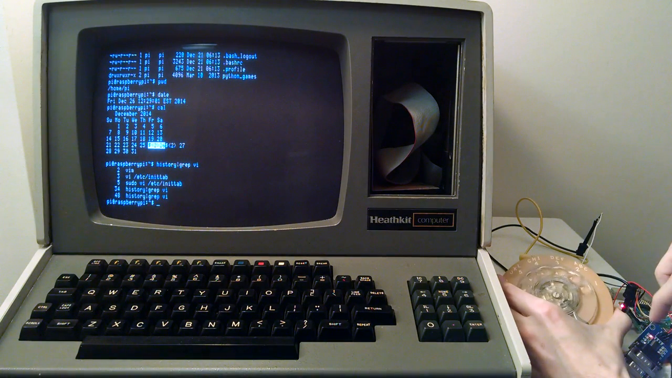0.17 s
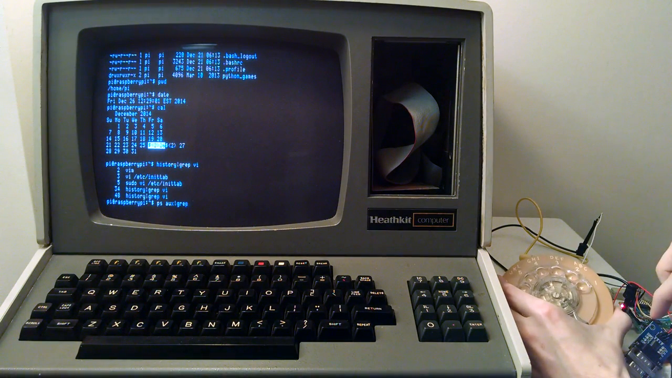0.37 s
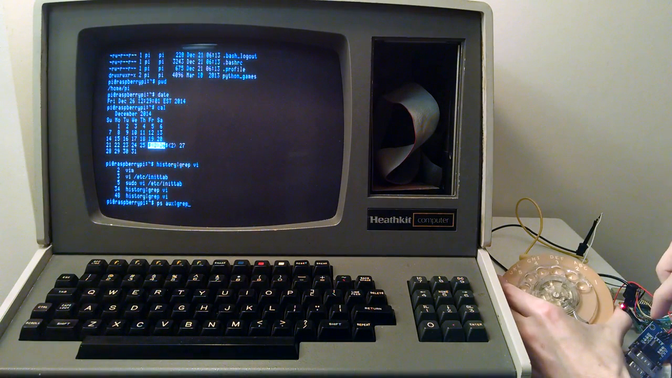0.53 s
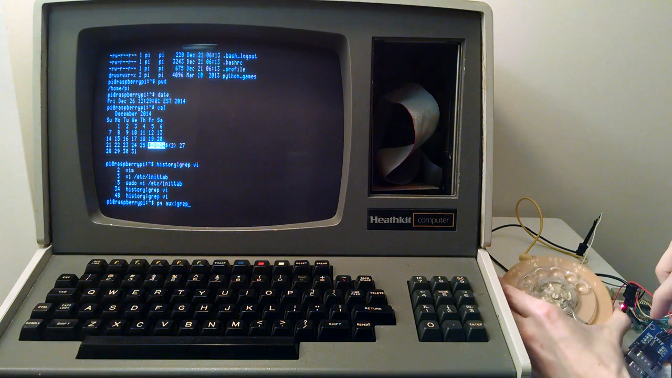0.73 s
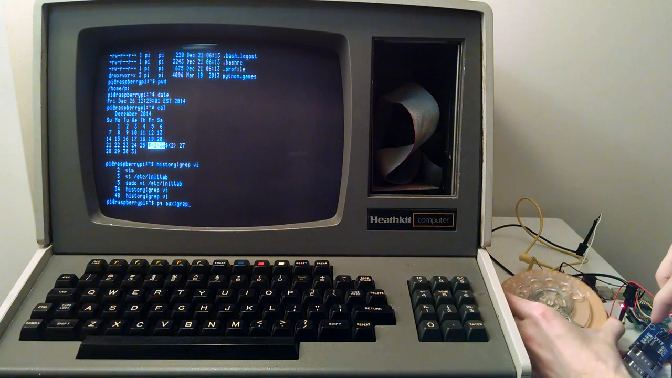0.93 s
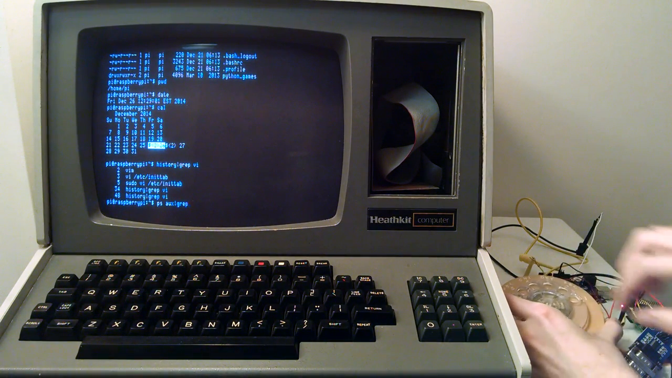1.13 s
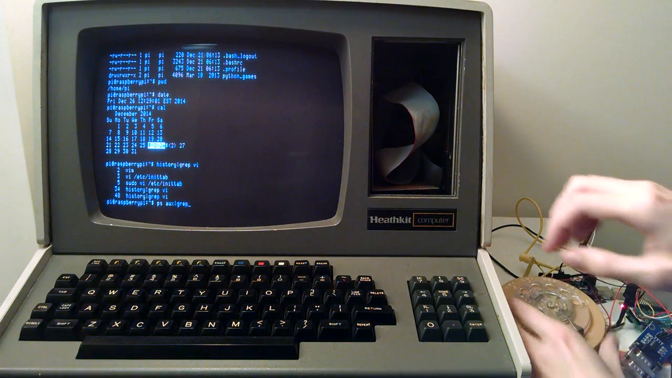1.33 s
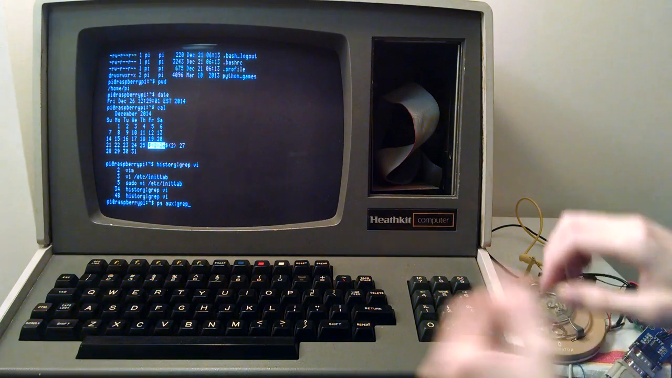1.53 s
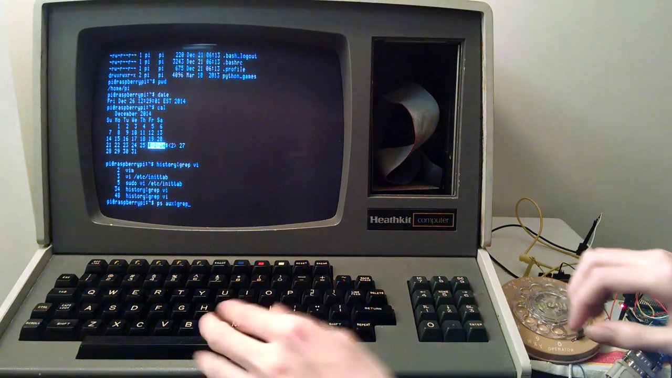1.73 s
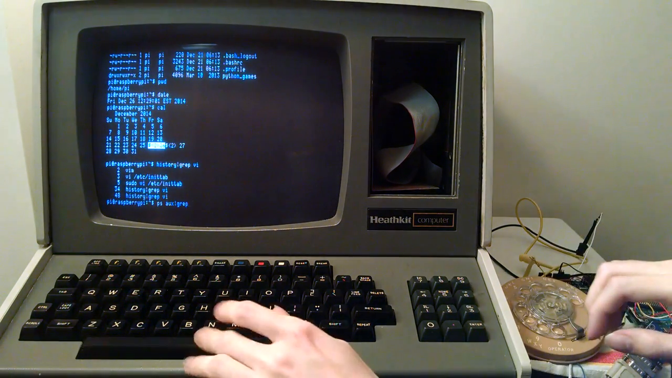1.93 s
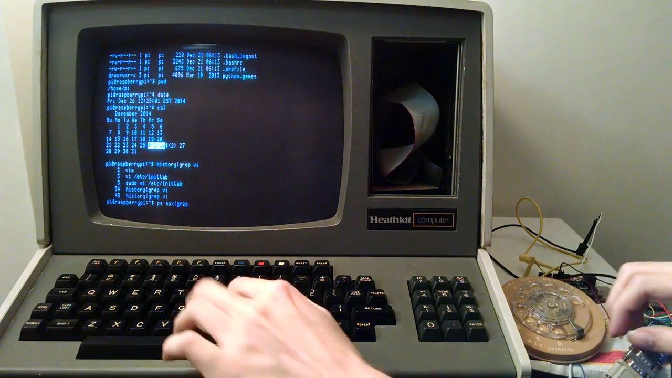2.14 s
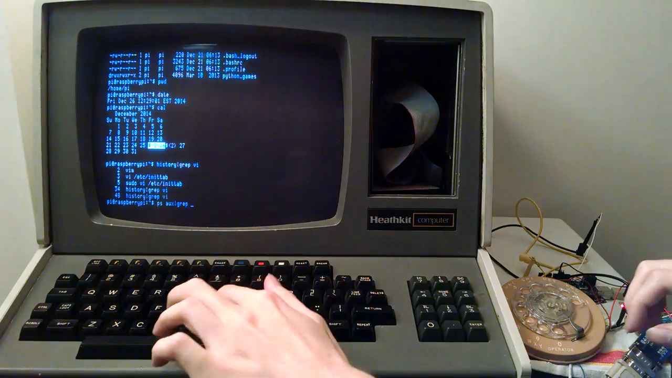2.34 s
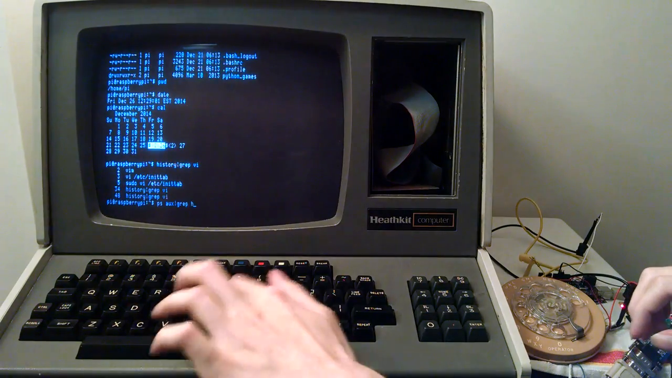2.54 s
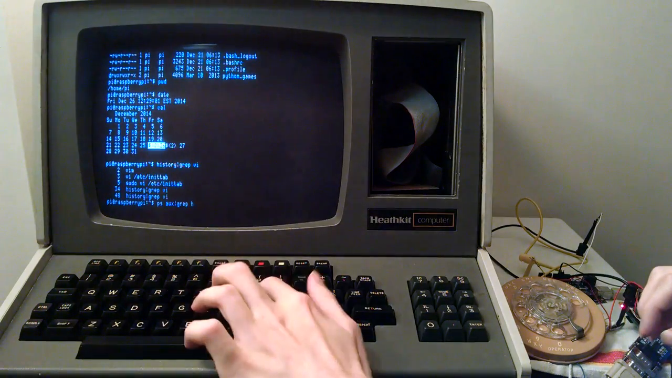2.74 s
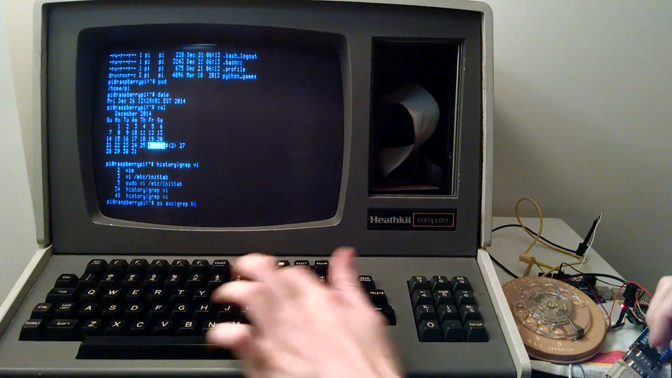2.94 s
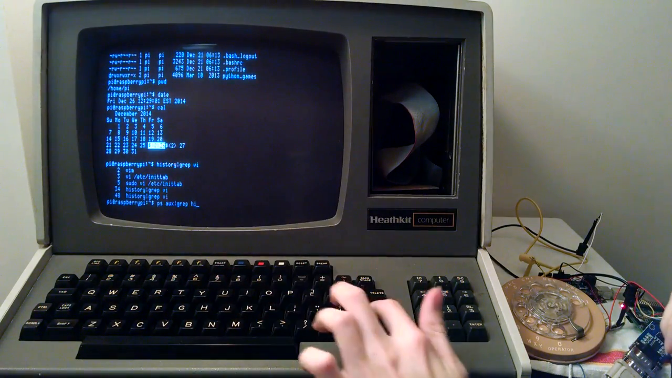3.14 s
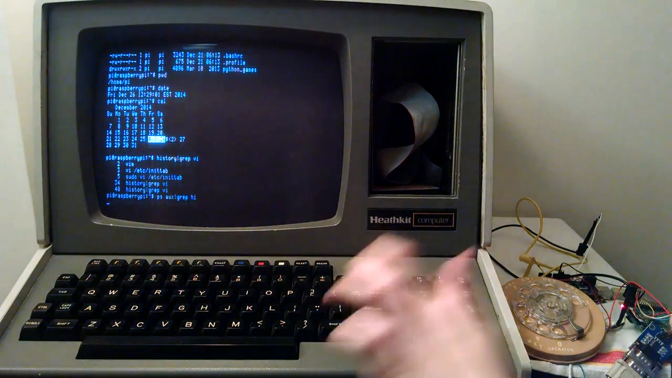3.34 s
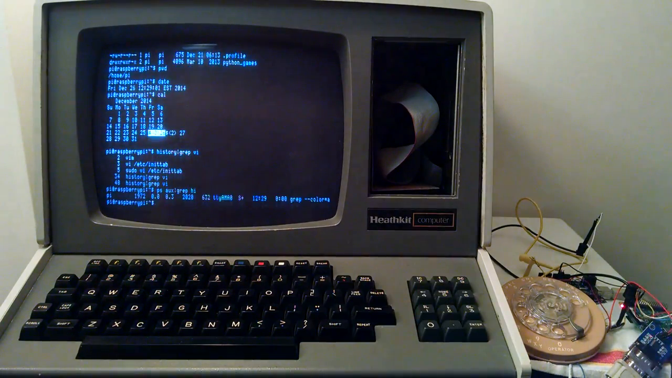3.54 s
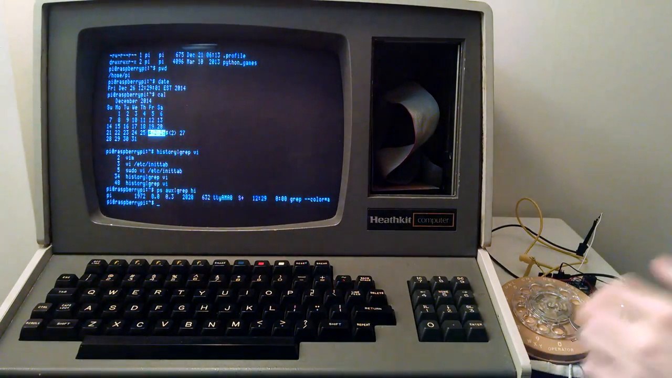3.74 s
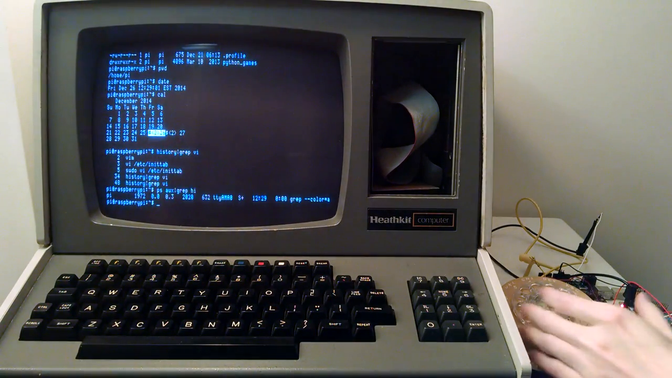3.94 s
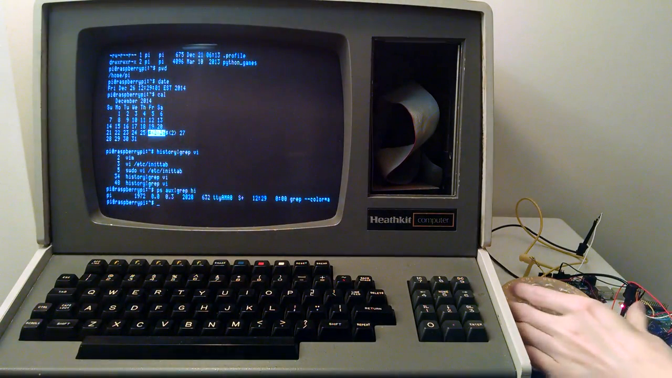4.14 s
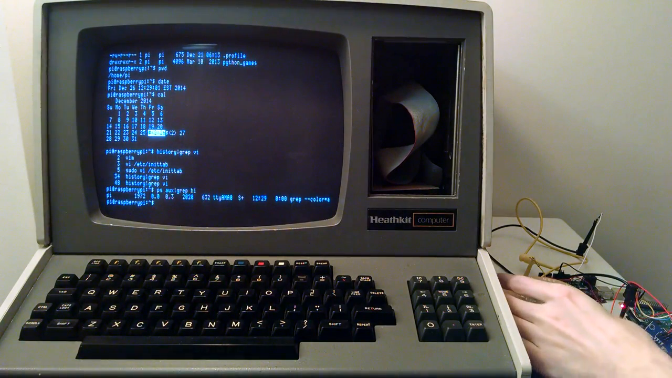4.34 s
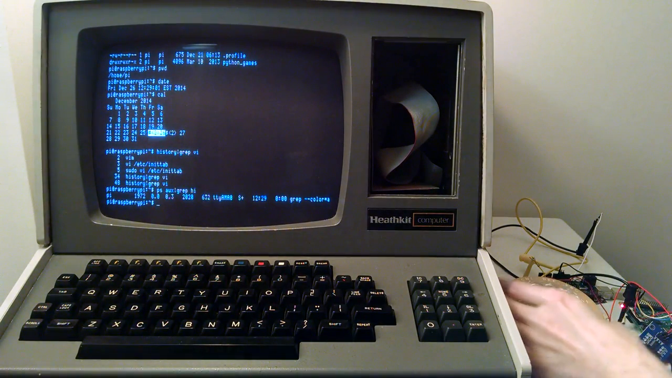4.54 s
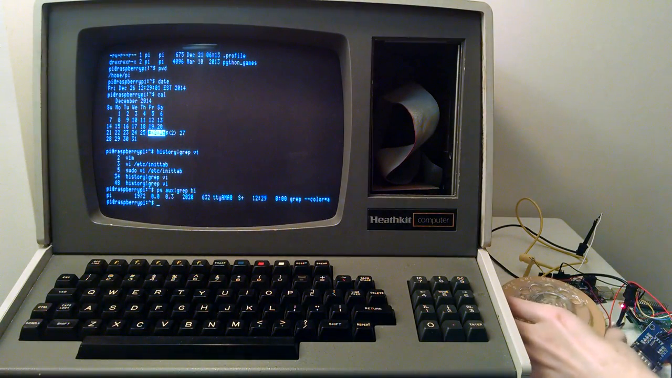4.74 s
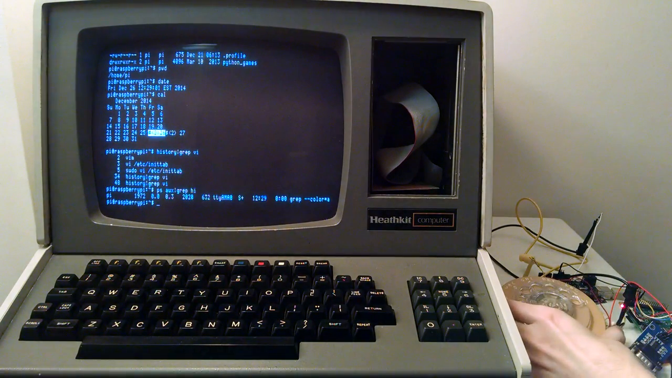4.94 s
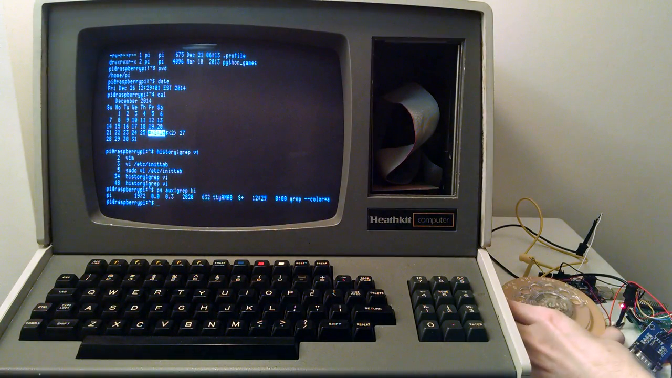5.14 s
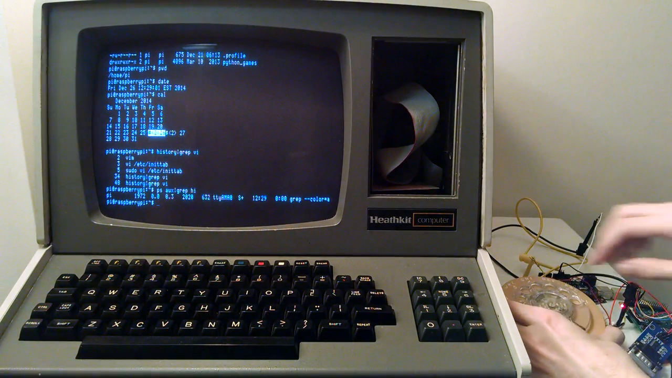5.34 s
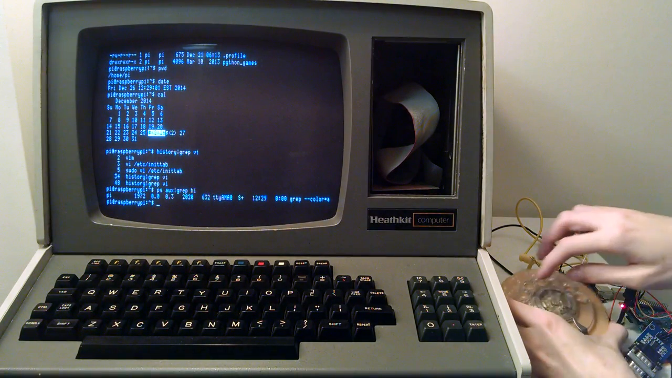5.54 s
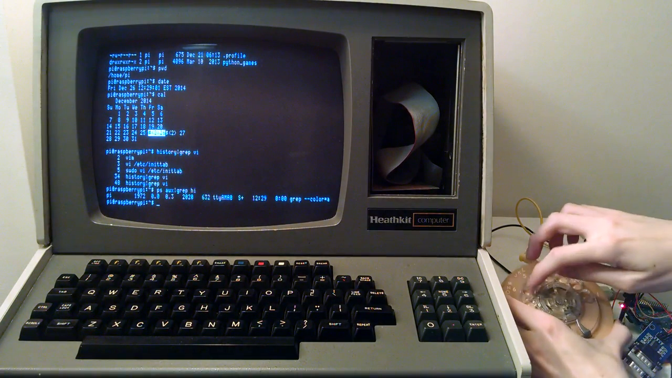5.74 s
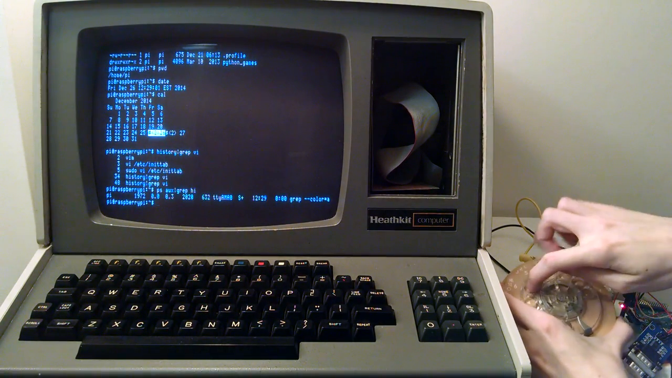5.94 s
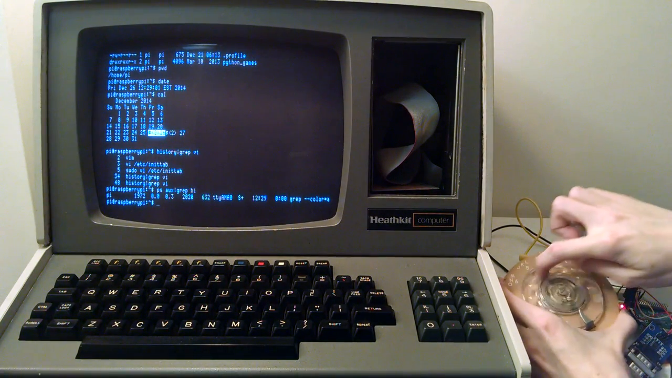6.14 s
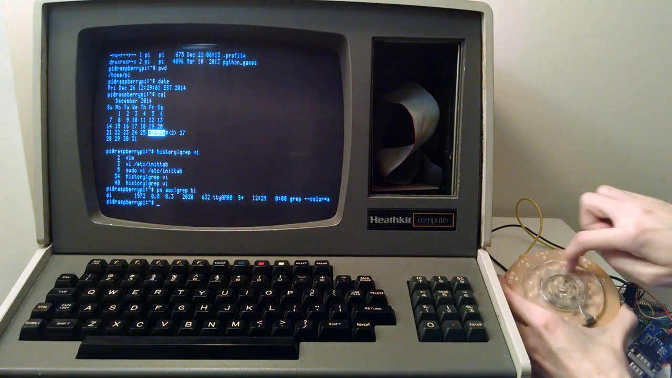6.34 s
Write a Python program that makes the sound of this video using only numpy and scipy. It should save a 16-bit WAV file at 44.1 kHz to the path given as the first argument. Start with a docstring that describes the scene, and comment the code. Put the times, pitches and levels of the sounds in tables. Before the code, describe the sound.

A steady fan rushes through a resonant case for about six seconds, with faint wavering tones, a low hum and a very high, thin screen whine. Soft dull pulses come about twice a second, alternately a hum puff and a bump. From 0 to 0.33 s a rotary dial runs home with a bright, gritty, ratcheting whirr and small contact clicks, ending in a sharp stop click. Near 1.5 to 1.6 s fingers softly bump its base. Keys then strike in uneven pairs at 2.09 and 2.20, 2.56 and 2.66, 2.94 and 3.04, 3.40 and 3.46 s: crisp plastic snaps, ringing metal, hollow thuds, quick rebounds and springy rattles, the first ones loudest. Around 2.7 s the low hum swells and beats slowly. After 3.6 s only hum, fan, whine and pulses continue. Small room, close wide stereo; background dips slightly after loud keys.

```python
"""A terminal's fan hums and its picture tube whines throughout; a clock-like pulse comes about twice a second.
First a rotary dial whirs home on its governor and gear noise, clicks at its stop and rings out.
Fingers then leave its base, and eight key strokes follow: contact noise over ringing metal and hollow case.
Between them a low beating hum swells. All but the tube whine and the whirr's low ringing tone is widened by
two close microphone ports; a gain control ducks after loud keys, holds and recovers."""
import sys
import numpy as np
from scipy import signal
from scipy.fft import rfft, irfft, next_fast_len
from scipy.io import wavfile
from scipy.ndimage import uniform_filter1d, minimum_filter1d, map_coordinates

SR = 44100
rng = np.random.default_rng(int(sys.argv[2]) if len(sys.argv) > 2 else 0)


def master(y):
    """Save y as 16-bit WAV."""
    cut = np.clip(np.atleast_2d(y).T, -1, 1)
    pcm = np.round(cut * 32767)  # scale
    wavfile.write(sys.argv[1], SR, pcm.astype(np.int16))


N = 285768
TIME = np.arange(N) / SR  # s, the whole scene
AGE = np.arange(SR // 4) / SR  # s since a short sound began

# Spectra give relative colour only: the noise they shape is then set to rms 1.
# fan air and hiss: pitch_hz, density_db
AIR_SPECTRUM = [(20, -32), (32, -1.5), (52, 0.5), (96, -8.5), (204, -7), (300, -7.5), (420, -7),
                (650, -5.5), (930, -12.5), (1350, -17.5), (2100, -16.5), (2800, -19), (3800, -22),
                (5500, -24.5), (7000, -24.5), (9000, -30), (12000, -26), (14500, -24.5), (15400, -29),
                (15700, -42)]
# resonances of the fan's air path: pitch_hz, width_hz, gain_db
AIR_RESONANCES = [(50, 31, 4), (165, 3.5, 3.5), (208.5, 15, 8), (366, 77, 7), (516, 5, 5.5),
                  (736, 7.2, -7.5), (780, 14, 6.5), (1128, 48, 3), (1286, 24, 3.5), (1362, 21, 6),
                  (1437, 10, 6), (3900, 340, 5.5)]
# unsteady fan tones: pitch_hz, level_db (before a common trim)
FAN_TONES = [(384, -50), (593, -47.5), (714, -51.5), (769, -51), (833, -45.5), (887, -70.5), (1152, -49.5),
             (1535, -61)]

# low hum, then its octave, each beating: level_db (after the swell), beat_period_s, crest_s, beat_depth (0-1)
DRONE_PARTIALS = [(-49.5, 0.522, 3.67, 0.38), (-47.5, 0.907, 3.71, 0.37)]
# the hum starts softer and swells: swell centre, how fast, level before
DRONE_SWELL_S, DRONE_RISE_S, DRONE_EARLY_DB = 2.7, 0.092, -6

# tube's line whine, then its lower sidebands: mid_db (in phase), side_db (in opposite phase)
WHINE_PARTIALS = [(-49.5, -44), (-57.5, -37), (-55.5, -51), (-62, -68)]
LINE_HZ, SIDEBAND_HZ = 15448, 384

PULSE_TIMES_S = .293 + np.arange(7)

# colour of the dial's whirr: pitch_hz, density_db
WHIRR_SPECTRUM = [(1300, -12), (2300, 0), (3300, -3.5), (4700, -9.5), (7500, -2), (9100, -5), (10300, 1.5),
                  (12500, 0), (14500, -2), (15400, -2), (16000, -25)]
# tone colour of the whirr, bands raised or lowered: pitch_hz, width_hz, gain_db
WHIRR_BANDS = [(2500, 250, -29), (4300, 100, 12), (4720, 43, 15), (5660, 52, 13), (6200, 64, 9),
               (6700, 100, -2), (8850, 90, 12.5), (9400, 100, 9), (10080, 80, -5), (12300, 110, 3),
               (12880, 220, 8.5), (13900, 60, 4)]
# bands of the whirr's low ringing tone, heard only in the side: pitch_hz, width_hz, gain_db
SIDE_TONE_BANDS = [(2430, 55, 21), (2650, 80, 20)]
# dial contacts, then the end stop: start_s, level_db
DIAL_CLICKS = [(.049, -37), (.111, -32), (.132, -34), (.159, -35), (.18, -32), (.19, -32), (0.3274, -19.5),
               (.3288, -18), (.3305, -22)]
# colour of those clicks: pitch_hz, density_db
CLICK_SPECTRUM = [(3000, -24), (5000, -19), (6500, -3), (9000, 3), (11500, -6), (14500, -3), (16000, -11)]
# fingers let go of the dial's wooden base: start_s, level_db
BASE_BUMPS = [(1.512, -36), (1.592, -28)]
WHIRR_DB, SPIN_UP_DB_PER_S = -35.5, 11  # whirr level at 0 s and its growth as it runs
COAST_S, COAST_DB = 0.214, -36  # after the last contact it coasts more quietly
HOME_S, RING_OUT_DB_PER_S = 0.33, 270  # at the stop the works ring out
SIDE_TONE_DB = -9  # over the whirr

# key strokes: start_s, strength_db, hardness_db, thud_db, thud_hz, clack_hz, ping_db, stem_hz, tick_db,
# contact_s, rebound_delay_s, rebound_db, rebound_thud_db.
# Later dB count from the strength, rebound_thud_db from the rebound's own; thuds get a common trim.
KEY_STROKES = [(2.088, -14.5, 3.5, -5, 397, 1270, 1.5, 2440, -7, 0.000098, .0098, -7, 14),
               (2.1965, -12.5, -16, -1, 450, 1150, -3, 2150, -4, 0.00051, .0078, -1, 3),
               (2.5594, -16.5, 3, 3.5, 670, 1110, 8.5, 2470, -1.5, 0.00024, 0.0067, -7, 5),
               (2.6576, -31, -6, -4, 500, 1250, 2.5, 2410, -5.5, 0.00046, .0043, 2, -4),
               (2.9446, -23.5, -2, -6, 700, 1450, 8.5, 2420, -6.5, 0.00046, 0.0047, -2, 2),
               (3.038, -24.5, -12, -4, 850, 1280, 0, 2510, -1.5, 0.00035, .0105, -3.5, -13),
               (3.4, -18.5, 15, -2, 600, 1500, 5, 2530, -2, 0.00015, .008, -10.5, 9),
               (3.4641, -22, 1, 6, 575, 1200, -9, 2500, 1, 0.00063, 0.0035, -2, 13.5)]
# one contact's hard impact, over in a few cycles: pitch_hz, level_db, t60_s
IMPACT_MODES = [(1535, -8, 0.017), (3370, -20, 0.0061), (5050, -11.5, 0.004), (7130, -10, 0.0068),
                (10700, -4, 0.0018), (13700, -6, 0.0027)]
# the hollow case: pitch_hz, level_db, t60_s
CASE_MODES = [(135, 2, 0.067), (244, 4.5, 0.037), (345, 1, 0.059), (438, 3.5, 0.11), (507, 8.5, 0.049),
              (583, 2, 0.076), (680, 9, 0.046), (747, 5.5, 0.041), (844, -2, 0.1)]
# the plate that holds the keys: pitch_hz, level_db, t60_s
PLATE_MODES = [(862, 0.5, 0.071), (963, -4.5, 0.11), (1129, -2.5, 0.071), (1223, 0.5, 0.053),
               (1290, -9, 0.08), (1393, -1, 0.077), (1476, -9.5, 0.046), (1670, 0, 0.051), (2080, -14, .04)]
# a key's stem: pitch_ratio (multiple of its pitch), level_db, t60_s
STEM_MODES = [(1, -1, 0.014), (.94, -10, 0.0054), (1.09, -6, 0.0094), (.995, -21, .075), (1.38, -15, .025),
              (1.46, -18, 0.059)]
# colour of the plastic snap: pitch_hz, density_db
SNAP_SPECTRUM = [(500, -15), (1400, 0.5), (2000, -8), (2500, 16), (3100, 2), (3700, 5), (4800, -5),
                 (7500, -10), (10000, -19), (16000, -26)]
# colour of ticks, rubs and puffs: pitch_hz, density_db
TICK_SPECTRUM = [(3000, -1.5), (6000, -2), (9000, -2), (11800, 3.5), (14200, 4), (15100, -8), (16000, -22)]
# key springs that rattle and ring on: start_s, pitch_hz, width_hz, level_db, t60_s
SPRING_RINGS = [(2.088, 8650, 120, -36, 0.091), (2.198, 8550, 120, -40.5, 0.1),
                (2.2, 13500, 400, -27, 0.19), (2.1985, 13500, 1000, -28, 0.038),
                (2.2045, 14000, 600, -32, 0.039), (2.218, 5670, 150, -32, 0.051),
                (2.56, 11600, 300, -25.5, 0.068), (2.5803, 12000, 300, -27, .02),
                (2.9485, 3550, 200, -28.5, 0.03), (3.039, 13200, 300, -34, .08)]
# fingers graze a cap or the dial: start_s, level_db
FINGER_TOUCHES = [(1.53, -40), (1.607, -41), (1.99, -35.5), (2.175, -38), (2.65, -38), (2.798, -34.5),
                  (3.021, -34), (3.461, -32)]
CASE_REACH_HZ, PLATE_REACH_HZ = 271, 254  # how far from its own pitch a key still drives the modes
IMPACT_DB, CLACK_DB, SNAP_DB = 2, -5, -6
SNAP_PER_HARDNESS = 0.81  # dB of plastic snap per dB of hardness
SLIDE_DB, SLIDE_S = -14, 0.0047  # the stem's rub: level over its tick, rise time
TOUCH_CLACK_DB, TOUCH_HZ = -9, 1290  # a graze's faint plate ring, over the graze
CHATTER_PER_S, CHATTER_T60_S, CHATTER_SHARE = 120, 0.0091, .75  # a loose cap taps after each blow
REBOUND_HARDNESS_DB, REBOUND_TICK_DB, REBOUND_PING_DB = 4.5, -6, -5  # added for the second contact

# the small room's decay: pitch_hz, t60_s
ROOM_DECAY = [(200, 0.54), (1200, 0.13), (4000, 0.27), (14000, 0.058)]
# the two ports: pitch_hz, side_db, share (of the side that follows the mid), phase_rad, cross_feed (share)
PORTS = [(50, -1, 0.92, 2.7, 0.0029), (134, -5, 1, 1.85, 0.013), (222, -3.5, 0.55, 2.8, 0.14),
         (415, -6.5, 0.28, 0.85, 0.0093), (870, -9.5, 1, 3.2, 0.61), (1310, -0.5, .1, 4.4, 1),
         (2420, -4.5, 0.18, 2.5, 0.87), (3550, -3, 0.45, 4.45, 0.16), (7000, 2, 0.38, 4.5, 0.34),
         (13000, -1, 0.59, 3.4, 0.83)]
TOP_HZ = 15800  # band limit


def amp(db):
    """Decibels to gain."""
    return 10 ** (np.asarray(db) / 20)


def unit(x):
    """Scale to rms 1."""
    return x / np.sqrt(np.mean(x ** 2) + 1e-20)


def along(points, hz):
    """Read (pitch_hz, value) points on a log frequency axis."""
    f, v = np.transpose(points)
    return np.interp(np.log(hz + 1), np.log(f + 1), v)


def wobble(rate):
    """A smooth random curve, rate knots a second."""
    knots = rng.standard_normal(int(N * rate / SR) + 4)
    steps = np.arange(0, len(knots) - 1, 1 / 8)
    return np.interp(TIME * rate, steps, map_coordinates(knots, [steps]))


def filtered(x, response):
    """Shape x by a response of frequency."""
    n = x.shape[-1]
    padded = next_fast_len(n + 8192)
    hz = np.fft.rfftfreq(padded, 1 / SR)
    return irfft(rfft(x, padded) * response(hz), padded)[..., :n]


def noise(spectrum, size):
    """Two unrelated coloured noises of rms 1."""
    return unit(filtered(rng.standard_normal((2, size)), lambda hz: amp(along(spectrum, hz))))


def humps(bands, hz):
    """Gain of raised or lowered bands, each a bell in dB around its centre."""
    return amp(sum(db / (1 + ((hz - centre) / width) ** 2) for centre, width, db in bands))


def fade(t60):
    """An exponential decay, 60 dB down after t60 seconds."""
    return np.exp(-np.log(1000) * AGE / max(t60, 1e-3))


def ring(modes, scatter):
    """Struck modes decay as sines, at slightly new strengths per blow; scatter (rad) spreads their phases."""
    out = 0
    for hz, db, t60 in modes:
        gain = amp(db + rng.normal(0, 0.2, (2, 1)))
        phase = scatter * rng.standard_normal((2, 1))
        out = out + gain * fade(t60) * np.sin(2 * np.pi * hz * AGE + phase)
    return out


def struck(modes, centre_hz, reach_hz):
    """The ring of these modes when a key drives mostly those near its own pitch."""
    driven = [(hz, db - 20 * np.log10(1 + ((hz - centre_hz) / reach_hz) ** 2), t60) for hz, db, t60 in modes]
    return ring(driven, scatter=.55)


def add(track, s, sound):
    """Mix a sound in at time s."""
    part = track[:, max(round(s * SR), 0):][:, :sound.shape[1]]
    part += sound[:, :part.shape[1]]


def in_room(sound, near_db, far_db):
    """A short sound with quick echoes off desk and screen, and the small room's tail, shorter where damped."""
    hz, t, z = signal.stft(rng.standard_normal((2, len(AGE))), SR, nperseg=256)
    decay = np.exp(-np.log(1000) * t / along(ROOM_DECAY, hz)[:, None])
    tail = signal.istft(z * decay, SR, nperseg=256)[1][:, :len(AGE)]
    near = rng.standard_normal((2, len(AGE))) * fade(0.085) * (AGE > .002)
    echoes = amp(near_db) * near / np.linalg.norm(near[0]) + amp(far_db) * tail / np.linalg.norm(tail[0])
    return sound + signal.fftconvolve(sound, echoes, axes=1)[:, :len(AGE)]


def fan():
    """Air rushes through the resonant case, with slightly unsteady tones on top."""
    flutter_db = .35 * wobble(5)
    rush = unit(filtered(noise(AIR_SPECTRUM, N), lambda hz: humps(AIR_RESONANCES, hz)))
    out = amp(-35.5 + flutter_db) * rush
    quadrature = np.array([[0], [np.pi / 2]])
    for hz, db in FAN_TONES:
        phase = 2 * np.pi * np.cumsum(hz + 0.812 * wobble(6)) / SR
        tone_db = db - 1.5 + 1.2 * wobble(4.014)
        out += np.sqrt(2) * amp(tone_db) * np.sin(phase + quadrature)
    return out


def drone(drone_hz=131):
    """A low hum with its octave; both beat slowly and grow louder partway through."""
    out, quadrature = np.zeros((2, N)), np.array([[0], [np.pi / 2]])
    early = (1 - np.tanh((TIME - DRONE_SWELL_S) / DRONE_RISE_S)) / 2  # 1 before the swell, 0 after
    phase = 2 * np.pi * np.cumsum(drone_hz + 0.58 * wobble(6)) / SR
    for k, (db, period, crest, depth) in enumerate(DRONE_PARTIALS):
        beat = 1 + np.clip(depth, 0, 1) * np.cos(2 * np.pi * (TIME - crest) / period)
        out += np.sqrt(2) * amp(db + DRONE_EARLY_DB * early) * beat * np.sin((k + 1) * phase + quadrature)
    return out


def tube():
    """Mid and side of the line whine; their levels drift as hands move through its standing waves."""
    out = np.zeros((2, N))
    for k, (mid_db, side_db) in enumerate(WHINE_PARTIALS):
        phase = 2 * np.pi * (LINE_HZ - k * SIDEBAND_HZ) * TIME
        mid = amp(mid_db + 0.7 * wobble(3.9)) * np.sin(phase)
        side = amp(side_db + .7 * wobble(2.95)) * np.cos(phase + .25)
        out += np.sqrt(2) * np.array([mid, side])
    return out


def clock():
    """A soft hum burst with a puff of hiss every second, and a duller bump in between."""
    out, puffs = np.zeros((2, N)), np.zeros(N)
    for s in PULSE_TIMES_S:
        t = TIME - s
        hum = np.sin(2 * np.pi * 210 * t + rng.uniform(0, 2 * np.pi, (2, 1)))
        bump = np.sin(2 * np.pi * 140 * t + rng.uniform(0, 2 * np.pi))
        out += amp(-32.0) * np.exp(-(t / 0.03) ** 2) * hum
        out += amp(-30) * np.exp(-((t - .487) / 0.0087) ** 2) * bump
        puffs += np.exp(-np.abs(t) / 0.032)
    return out + amp(-41.5) * puffs * noise(TICK_SPECTRUM, N)


def dial_effort(governor_hz=40, sway=0.091, flutter=0.079):
    """How hard the works rub: spin up, coast, ring out, pulsing at the governor's turns and third harmonic."""
    running_db = np.where(TIME < COAST_S, WHIRR_DB + SPIN_UP_DB_PER_S * TIME, COAST_DB)
    level_db = running_db - RING_OUT_DB_PER_S * np.maximum(TIME - HOME_S, 0)
    turn = 2 * np.pi * np.cumsum(governor_hz + wobble(16)) / SR
    return amp(level_db) * (1 + sway * np.sin(turn) + flutter * np.sin(3 * turn))


def patchy(x, depth_db):
    """The rubbing excites ever different resonances: a random gain over time and frequency."""
    z = signal.stft(x, nperseg=256)[2]
    field = uniform_filter1d(rng.standard_normal(z.shape[1:]), size=3, axis=0)
    field = uniform_filter1d(field, size=4, axis=1)
    return signal.istft(z * amp(depth_db * unit(field)), nperseg=256)[1][:, :N]


def whirr_side_tone():
    """Mid (silent) and side of the whirr's low ringing tone: narrow noise near 2.4 and 2.65 kHz."""
    tone = unit(filtered(rng.standard_normal(N), lambda hz: humps(SIDE_TONE_BANDS, hz) - 1))
    return np.outer([0, 1], amp(SIDE_TONE_DB) * dial_effort() * tone)


def dial(teeth_per_s=171, teeth_db=-7):
    """The governor rubs and gear teeth tick as the dial runs home; it clicks at its stop and the hand lets go."""
    tooth = np.floor(np.cumsum(teeth_per_s * (1 + 0.025 * wobble(20))) / SR)
    teeth = unit(np.diff(tooth, prepend=0) * rng.uniform(0.54, 1, N))
    # each tooth leaves a short decaying scrape
    scrapes = np.sqrt(np.abs(signal.fftconvolve(teeth ** 2, fade(0.0067) ** 2)[:N]))
    rubbing = rng.standard_normal((2, N)) * amp(.6 * wobble(299))
    ticking = unit(scrapes * rng.standard_normal((2, N)))
    works = patchy(rubbing + amp(teeth_db) * ticking, depth_db=1.5)
    whirr = unit(filtered(works, lambda hz: amp(along(WHIRR_SPECTRUM, hz)) * humps(WHIRR_BANDS, hz)))
    out = dial_effort() * whirr
    for s, db in DIAL_CLICKS:
        click = noise(CLICK_SPECTRUM, len(AGE)) * fade(0.0078)
        add(out, s, amp(db) * in_room(click, near_db=-14, far_db=-12))
    for s, db in BASE_BUMPS:
        # the base borrows the hollow case's modes, with a soft onset
        add(out, s, amp(db) * ring(CASE_MODES, scatter=1.0) * (1 - fade(0.084)))
    return out


def slides():
    """The key stem rubs in its guide just before each stroke lands, in proportion to its tick."""
    out = np.zeros(N)
    for s, db, *_, tick_db, contact_s, delay, rebound_db, rebound_thud_db in KEY_STROKES:
        out += amp(db + tick_db + SLIDE_DB) * np.exp(-np.abs(TIME - s) / SLIDE_S) * (TIME < s)
    return out * noise(TICK_SPECTRUM, N)


def chatter(count=40):
    """The envelope, of rms 1, of a loose cap tapping at uneven intervals."""
    gaps, sizes = rng.uniform(.4, 1.6, (2, count))
    tap_samples = (np.cumsum(gaps) / CHATTER_PER_S * SR).astype(int)
    taps = np.bincount(tap_samples, sizes, len(AGE))[:len(AGE)]
    power = np.abs(signal.fftconvolve(taps, fade(CHATTER_T60_S) ** 2)[:len(AGE)])
    share = np.clip(CHATTER_SHARE, 0, 1)
    return np.sqrt(1 - share + share * power / power.mean())


def crack(spectrum, t60, rattle_db, far_db):
    """A burst of contact noise, the key's brief rattle and a faint diffuse tail, summed as powers."""
    rattle = amp(rattle_db) * fade(0.04) * chatter()
    tail = amp(far_db) * fade(0.24)
    return noise(spectrum, len(AGE)) * np.sqrt(fade(t60) ** 2 + rattle ** 2 + tail ** 2)


def contacts():
    """Every stroke lands, then rebounds once with a harder contact, a weaker tick and a weaker ping."""
    for (s, db, hard_db, thud_db, thud_hz, clack_hz, ping_db, stem_hz, tick_db,
         contact_s, delay, rebound_db, rebound_thud_db) in KEY_STROKES:
        voice = thud_hz, clack_hz, stem_hz, contact_s
        yield s, db, hard_db, thud_db, tick_db, ping_db, *voice
        yield (s + delay, db + rebound_db, hard_db + REBOUND_HARDNESS_DB, rebound_thud_db,
               tick_db + REBOUND_TICK_DB, ping_db + REBOUND_PING_DB, *voice)


def keyboard():
    """Each key cracks against its stop, pings its stem, knocks the mounting plate and thuds into the case."""
    out = np.zeros((2, N))
    for s, db, hard_db, thud_db, tick_db, ping_db, thud_hz, clack_hz, stem_hz, contact_s in contacts():
        hits = sum(amp(level) * fade(t60) * np.sin(2 * np.pi * hz * AGE) for hz, level, t60 in IMPACT_MODES)
        impact = np.outer([1, 0], amp(IMPACT_DB + hard_db) * hits)  # straight from in front
        swell = 1 - fade(.008)
        thud = amp(thud_db - 16.0) * struck(CASE_MODES, thud_hz, CASE_REACH_HZ) * swell
        clack = amp(CLACK_DB) * struck(PLATE_MODES, clack_hz, PLATE_REACH_HZ)
        stem = [(ratio * stem_hz, level, t60) for ratio, level, t60 in STEM_MODES]
        ping = amp(ping_db) * ring(stem, scatter=0.97)
        snap_db = SNAP_DB + SNAP_PER_HARDNESS * hard_db
        snap = amp(snap_db) * crack(SNAP_SPECTRUM, t60=0.015, rattle_db=-5, far_db=-15.5)
        tick = amp(tick_db) * crack(TICK_SPECTRUM, t60=0.022, rattle_db=-1.5, far_db=-12.5)
        body = in_room(thud + clack, near_db=-11.5, far_db=-8) + in_room(ping, near_db=-7, far_db=-9)
        landing = 1 - np.exp(-AGE / max(contact_s, 1e-5))  # longer contact, softer onset
        add(out, s, amp(db) * landing * (impact + snap + tick + body))
    for s, db in FINGER_TOUCHES:
        graze = crack(TICK_SPECTRUM, t60=0.0098, rattle_db=-2, far_db=-8)
        knock = amp(TOUCH_CLACK_DB) * struck(PLATE_MODES, TOUCH_HZ, PLATE_REACH_HZ)
        add(out, s, amp(db) * (graze + knock))
    for s, hz, width_hz, db, t60 in SPRING_RINGS:
        hiss = rng.standard_normal((2, len(AGE)))
        coil = unit(filtered(hiss, lambda f: 1 / (1 + ((f - hz) / width_hz) ** 2)))
        add(out, s, amp(db) * coil * fade(t60))
    return out


def widened(pair, aside=0, comb_hz=2560):
    """Mid and side once each port has the other's delayed signal subtracted; aside ties side closer to mid."""
    def column(index, hz):
        return along(np.array(PORTS)[:, [0, index]], hz)

    def share(hz):
        return np.clip(aside + (1 - aside) * column(2, hz), 0, 1)

    def feed(hz):
        return np.clip(column(4, hz), 0, 1) * np.exp(-2j * np.pi * hz / comb_hz)

    # pair[0] is the mid, pair[1] feeds the part of the side that does not follow it
    direct = filtered(pair[0], lambda hz: share(hz) * np.exp(1j * column(3, hz)))
    diffuse = filtered(pair[1], lambda hz: np.sqrt(1 - share(hz) ** 2))
    # the subtraction combs mid and side in turn; the hypot keeps their summed power flat
    mid = filtered(pair[0], lambda hz: (1 - feed(hz)) / np.hypot(1, abs(feed(hz))))
    side = filtered(direct + diffuse,
                    lambda hz: amp(column(1, hz)) * (1 + feed(hz)) / np.hypot(1, abs(feed(hz))))
    return np.array([mid, side])


def scene():
    """Everything on the desk, as left and right; the dial lies off to one side."""
    desk = widened(fan() + drone() + clock() + slides() + keyboard())
    mid, side = desk + widened(dial(), aside=0.28) + whirr_side_tone() + tube()
    return np.array([mid + side, mid - side])


def record(dry, threshold_db=-21, slope=0.28, hold_s=0.21, smooth_s=0.079):
    """Gain control ducks after loud keys, holds and recovers; peaks round off; then the band limit."""
    power = uniform_filter1d(np.mean(dry ** 2, axis=0), SR // 200)
    level_db = 10 * np.log10(np.abs(power) + 1e-12)
    span = int(hold_s * SR) // 2
    wanted_db = -slope * np.maximum(level_db - threshold_db, 0)
    duck_db = minimum_filter1d(wanted_db, 2 * span + 1, origin=span)  # looks back over the hold
    pole = np.exp(-1 / (smooth_s * SR))
    ducked = dry * amp(signal.lfilter([1 - pole], [1, -pole], duck_db))
    rounded = ducked / (1 + np.abs(ducked / .88) ** 6) ** (1 / 6)
    return filtered(rounded, lambda hz: hz < TOP_HZ)


dry = scene()
out = record(dry)
master(out)
```